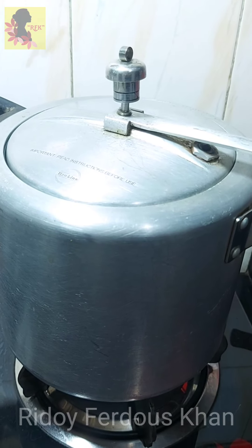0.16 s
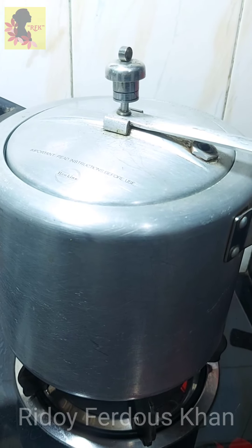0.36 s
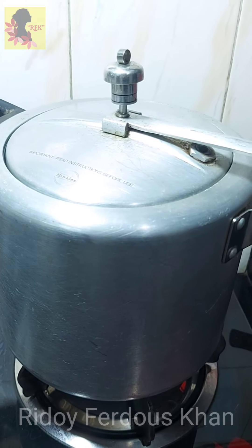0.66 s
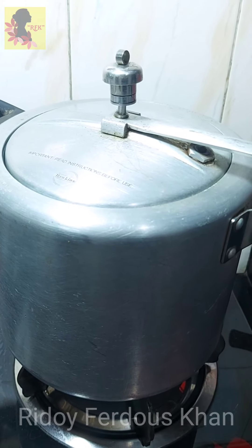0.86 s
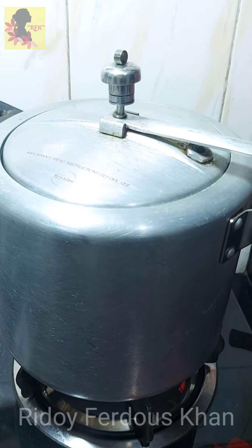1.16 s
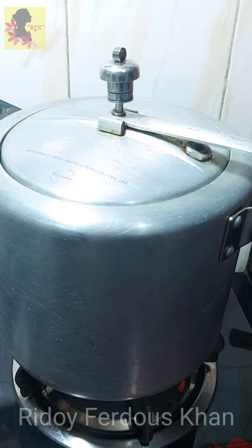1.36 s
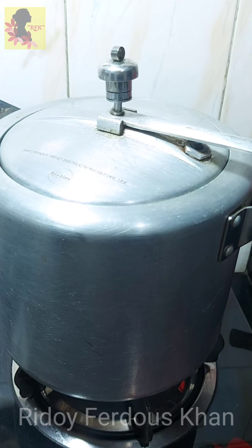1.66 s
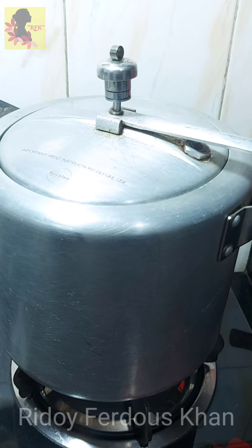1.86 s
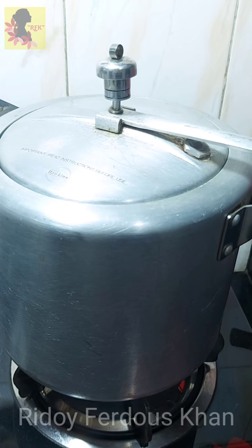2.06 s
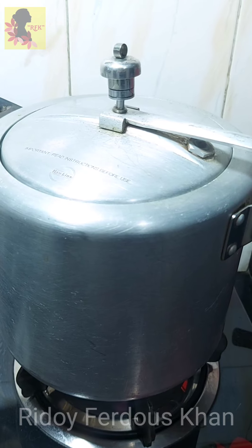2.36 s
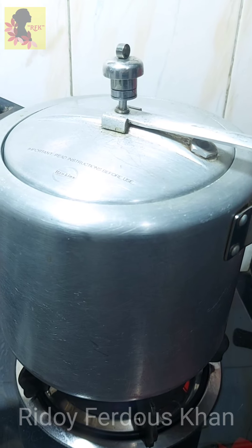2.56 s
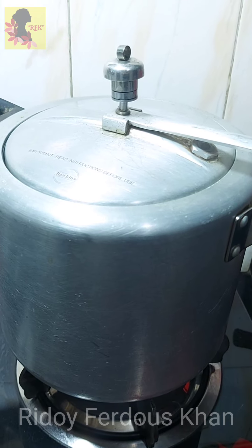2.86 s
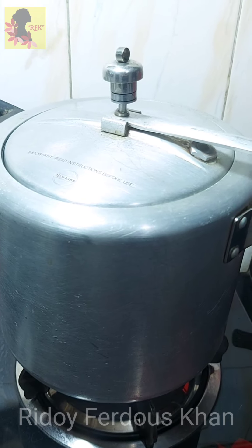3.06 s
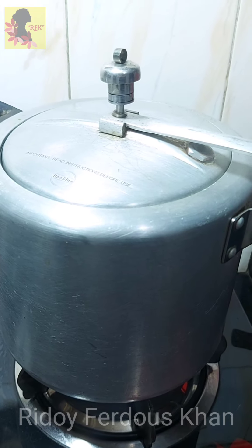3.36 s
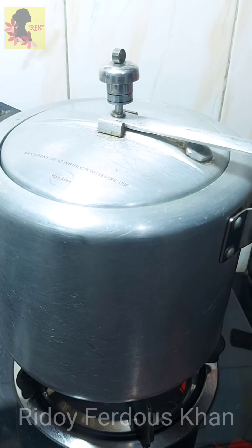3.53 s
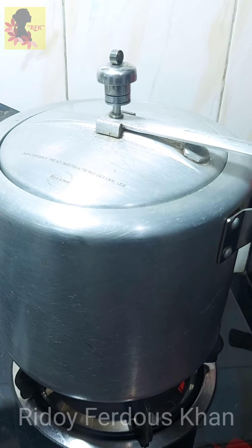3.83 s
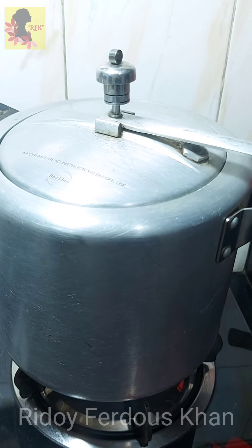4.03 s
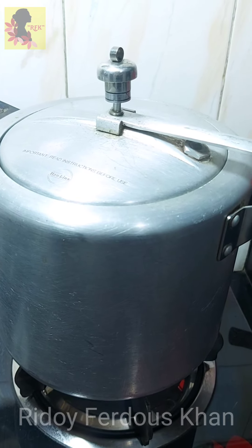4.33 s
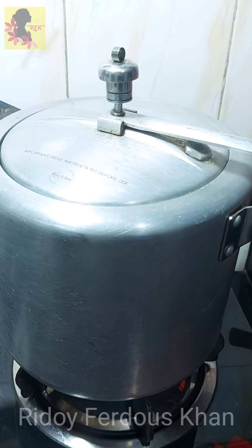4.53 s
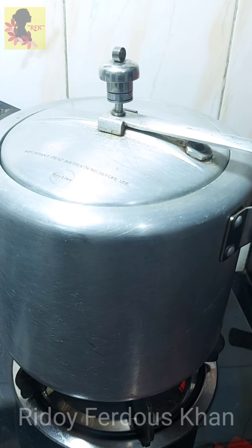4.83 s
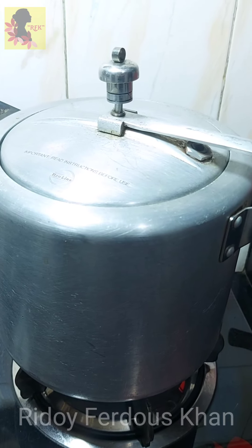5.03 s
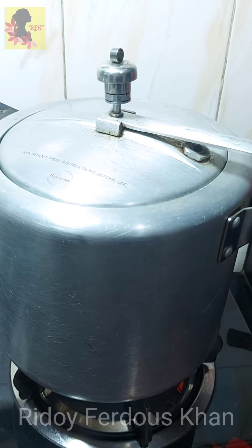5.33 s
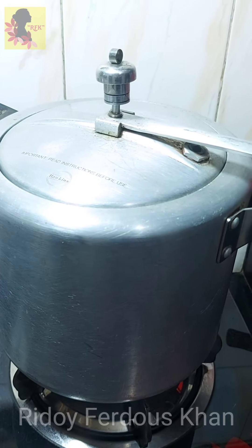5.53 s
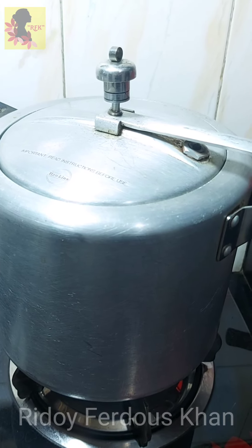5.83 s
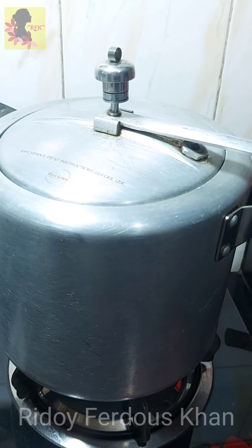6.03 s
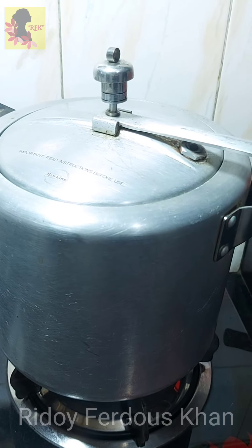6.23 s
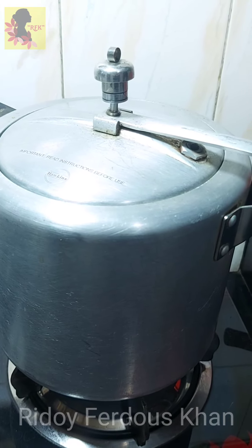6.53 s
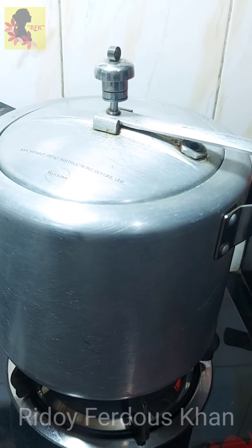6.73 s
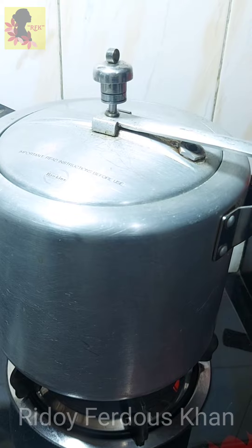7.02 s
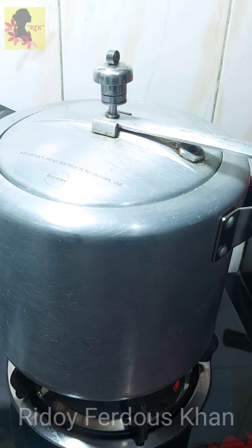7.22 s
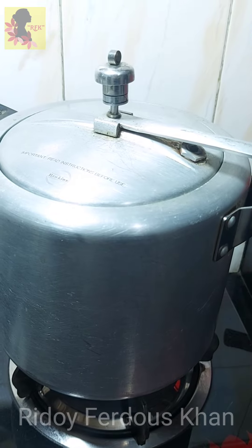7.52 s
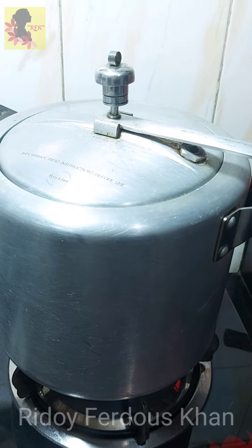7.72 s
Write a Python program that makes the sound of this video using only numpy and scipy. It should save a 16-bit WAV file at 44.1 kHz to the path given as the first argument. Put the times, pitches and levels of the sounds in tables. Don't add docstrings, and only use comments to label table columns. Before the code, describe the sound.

From 0 s a piercing steam hiss is already at full strength and continues unbroken to the end, just under 8 s. It is dense turbulent noise, concentrated around 10 to 12 kHz, with weaker hiss from 2 to 8 kHz and narrow metallic colouring from the hollow valve weight, but no clear whistle. The weight rocks slightly: brief swells near 0.6, 0.9 and 1.25 s, small dips near 1.7, 2.1 and 3.25 s, another swell near 3.6 s, then steadier after 4 s. Far below is a faint, low, fluttering gas flame roar, weakest near 1.6 s and a little fuller around 4.1 s. Soft, mostly masked pops come at 2.6 s right, 3.0 s left and a deeper one at 3.6 s centre. Close hand-held stereo phone, tight reflections from lid and tiles, treble leaning slightly left at first, little above 15.5 kHz.

```python
import sys
import numpy as np
from scipy import signal
from scipy.fft import rfft, irfft, next_fast_len
from scipy.io import wavfile
from scipy.ndimage import uniform_filter1d

SR = 44100
rng = np.random.default_rng(int(sys.argv[2]) if len(sys.argv) > 2 else 0)


def log_audio(samples):
    frames = np.atleast_2d(samples).T
    limited = np.clip(frames, -1, 1)
    pcm = np.round(limited * 32767).astype(np.int16)
    wavfile.write(sys.argv[1], SR, pcm)


def amplitude_ratio(level_db):
    exponent = np.asarray(level_db, float) / 20
    return 10 ** exponent


N = 347508
FRAME = 512


def level(x, db):
    return x * amplitude_ratio(db) / np.sqrt(np.mean(x ** 2))


def on_log(table, hz):
    table_hz, values = np.array(table)[:, :2].T
    return np.interp(np.log(hz + 1), np.log(table_hz + 1), values)


def shape(x, gain):
    n = next_fast_len(N)
    hz = np.fft.rfftfreq(n, 1 / SR)
    return irfft(rfft(x, n) * gain(hz), n)[..., :N]


def patches(frames, rate, width_hz):
    z = rng.standard_normal((FRAME // 2 + 1, frames))
    for _ in range(2):
        z = uniform_filter1d(z, size=1 + int(width_hz * FRAME / SR), axis=0)
        z = uniform_filter1d(z, size=1 + int(2 * SR / FRAME / rate), axis=1)
    return z / z.std()


def eddying(channels, db_of, slow_db, quick_db, width_hz):
    hz, s, z = signal.stft(rng.standard_normal((channels, N)), SR, nperseg=FRAME)
    db = db_of(hz[:, None], s)
    db = db + slow_db * patches(len(s), 3.6, width_hz)
    db = db + quick_db * patches(len(s), 25, width_hz / 3)
    return signal.istft(z * amplitude_ratio(db), SR, nperseg=FRAME)[1][:, :N]


def drift(s, column):
    # (time [s], steam pressure [dB], phone turn left minus right [dB], gas and boil [dB])
    controls = [(0.0, 0.4, 1.7, 0), (0.55, 0.5, 0.7, -0.3), (1.1, -0.7, 1, -0.7), (1.65, -0.3, 0.2, -2.7),
                (2.1, 0, 0.8, -1.2), (2.55, -0.1, -0.6, -1), (3.0, 0.6, -0.8, -0.5), (3.5, 0.6, -0.5, -1),
                (4.1, 0.4, -0.4, 1), (4.9, 0.5, 0, -0.5), (5.6, 0.9, 0.3, -0.7), (6.1, 0.4, -0.3, -0.1),
                (6.5, 0.2, 0.5, -1), (7.0, -0.2, -0.5, -1.3), (7.45, 0.5, 0.3, -0.5),
                (7.87, 0.1, -0.1, 0.5)]
    return np.interp(s, np.array(controls)[:, 0], np.array(controls)[:, column])


def rocking(s):
    # (time [s], change of level [dB])
    lifts = [(0.28, 0.3), (0.59, 1.2), (0.7, -0.7), (0.89, 1.0), (1.07, -0.3), (1.24, 1.9), (1.7, -2.2),
             (1.85, -0.2), (2.12, -1.3), (2.29, 0), (2.56, -0.9), (3.24, -1.4), (3.34, 0.9), (3.47, -1.2),
             (3.63, 1.5), (3.79, -0.4), (3.96, -0.7), (5.32, 0.4), (5.52, 0.7), (5.6, -1.0), (6.24, 0.6),
             (6.44, -0.3)]
    half_length_s = 0.042
    return sum(db * np.exp(-.5 * ((s - at) / half_length_s) ** 2) for at, db in lifts)


def weight_rings(hz):
    # (frequency [Hz], width [Hz], lift [dB])
    rings_and_dips = [(3475, 90, 3), (3700, 90, 2), (3820, 80, -3), (3946, 130, 3), (4080, 100, -2),
                      (4334, 140, 4), (4636, 80, 5), (5130, 100, 3), (6055, 140, 3), (6400, 150, 2),
                      (6999, 80, 3), (7470, 60, 4), (8919, 80, 3), (9177, 90, 3), (9500, 90, 3), (9850, 90, 3),
                      (10256, 70, 3), (10640, 80, 3), (11006, 86, 3), (11300, 60, 2), (11490, 60, 4),
                      (12129, 50, 3), (12350, 80, 3), (12900, 90, 2)]
    return amplitude_ratio(sum(db / (1 + (2 * (hz - f) / w) ** 2) for f, w, db in rings_and_dips))


def nearby(x):
    t = np.arange(1, 1200) / SR
    gap_s, decay_s = .003, .006
    echoes = rng.standard_normal(len(t)) * (t > gap_s) * np.exp(-t / decay_s)
    response = np.r_[1, amplitude_ratio(-9.5) * echoes / np.linalg.norm(echoes)]
    return signal.fftconvolve(x, response)[:N]


def steam():
    # (frequency [Hz], level [dB per Hz])
    jet_colour = [(1000, -27.5), (1600, -25.5), (2200, -21), (2600, -21), (3300, -20.5), (5100, -19),
                  (5600, -17.5), (8300, -12.5), (9200, -5), (10200, 0.35), (11300, 2), (12200, 0.9),
                  (13500, -5.5), (14800, -12)]
    # (frequency [Hz], level [dB])
    right_colour = [(5100, -0.1), (5600, 4.5), (8300, -1.1), (9000, -2.5), (10000, -11.5), (11000, -6),
                    (11800, 0), (13000, -8), (14400, 6), (15200, -1.3)]
    # (frequency [Hz], share [0-1])
    direct_share = [(1000, .25), (2600, .3), (2920, .69), (3060, .69), (3330, .12), (4700, .22), (5600, .1),
                    (10500, .35), (12200, .65), (13900, .55), (14600, .25), (15300, .45)]
    # (frequency [Hz], phase [rad])
    port_lag = [(0, 0), (1460, 2.8), (3190, 3.1), (4570, 6.4), (5430, 6.2), (6290, 8.4), (6630, 5.6),
                (7750, 5.7), (9820, 7.9), (10600, 8.6), (11000, 13.9), (12100, 16.5), (15300, 21.2),
                (16300, 22.4)]
    hiss_per_turn, hiss_per_gas, hiss_per_rock, turn_per_rock = -0.36, 0.26, .2, 0.86

    def swell(hz, s):
        lower = np.clip((8800 - hz) / 1000, 0, 1)
        screech = drift(s, column=1) + rocking(s)
        hiss = hiss_per_turn * drift(s, column=2) + hiss_per_gas * drift(s, column=3)
        hiss = hiss + hiss_per_rock * rocking(s)
        return (1 - lower) * screech + lower * (hiss + 1.2)

    def share(hz):
        return np.clip(on_log(direct_share, hz), 0, 1)

    def jet(hz):
        low_cut = np.hypot(1, (1100 / (hz + 1)) ** 4)
        return amplitude_ratio(on_log(jet_colour, hz)) * weight_rings(hz) / low_cut

    def treble(x):
        return shape(x, lambda hz: np.clip((hz - 8000) / 1500, 0, 1))

    direct, *scattered = eddying(channels=3, db_of=swell, slow_db=.25, quick_db=.8, width_hz=2000)
    late = shape(direct, lambda hz: np.exp(-1j * on_log(port_lag, hz)))
    ports = []
    for arrival, stray in zip((direct, late), scattered):
        straight = shape(arrival, lambda hz: np.sqrt(share(hz)))
        reflected = nearby(shape(stray, lambda hz: np.sqrt(1 - share(hz))))
        ports.append(straight + reflected)
    left, right = shape(np.array(ports), jet)
    t = np.arange(N) / SR
    turn = drift(t, column=2) + turn_per_rock * rocking(t) - .05
    left = left + (amplitude_ratio(turn / 2) - 1) * treble(left)
    right = right + (amplitude_ratio(-turn / 2) - 1) * treble(right)
    right = shape(right, lambda hz: amplitude_ratio(on_log(right_colour, hz)))
    return level(np.array([left, right]), -15.5)


def flame():
    # (frequency [Hz], level [dB per Hz])
    flame_colour = [(12, -44), (20, -13.5), (87, 5), (229, -3), (313, 0.5), (412, -4.5), (993, -6.5),
                    (1070, -8.5), (1600, -16), (2080, -19), (3520, -120)]
    roar_per_rock, rumble_per_rock, rumble_per_gas = 1, 0.65, 1.7

    def swell(hz, s):
        low = np.clip((250 - hz) / 100, 0, 1)
        roar = drift(s, column=3) + roar_per_rock * rocking(s)
        rumble = rumble_per_gas * drift(s, column=3) + rumble_per_rock * rocking(s) - 5.2
        return low * rumble + (1 - low) * roar

    common, left, right = eddying(channels=3, db_of=swell, slow_db=-0.3, quick_db=1.25, width_hz=1200)
    ports = np.array([left + 0.6 * common, 0.95 * right + 0.32 * common])
    ports = shape(ports, lambda hz: amplitude_ratio(on_log(flame_colour, hz)) / np.hypot(1, (hz / 1500) ** 4))
    return level(ports, -46.5)


def puffs():
    # (time [s], peak level [dB], frequency [Hz], left minus right [dB])
    pops = [
        (2.578, -35, 199, -10),
        (3.033, -35, 350, 8),
        (3.622, -30, 124, -1.0),
    ]
    out, t = np.zeros((2, N)), np.arange(2000) / SR
    low_pass = signal.butter(2, 1300, fs=SR, output="sos")
    for (s, db, hz, pan_db), noise in zip(pops, rng.standard_normal((len(pops), len(t)))):
        air = signal.sosfilt(low_pass, noise)
        swell_and_fade = (t / 0.0053) * np.exp(1 - t / 0.0054)
        pop = (np.sin(2 * np.pi * hz * t) + 2.9 * air) * swell_and_fade
        start = int(s * SR)
        out[:, start:start + len(t)] += pop * amplitude_ratio(db - 9.0 + np.array([[pan_db], [-pan_db]]) / 2)
    return out


def scene():
    return steam() + flame() + puffs()


def top_cut(x):
    return signal.sosfilt(signal.butter(12, 15510, fs=SR, output="sos"), x)


def record(dry):
    return top_cut(dry)


dry = scene()
out = record(dry)
log_audio(out)
```